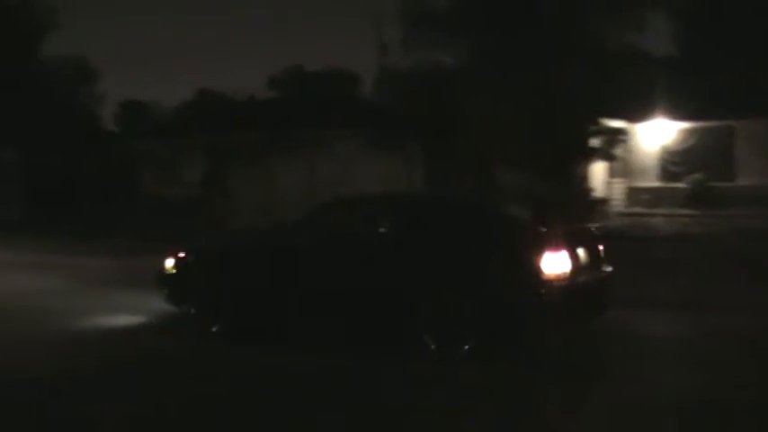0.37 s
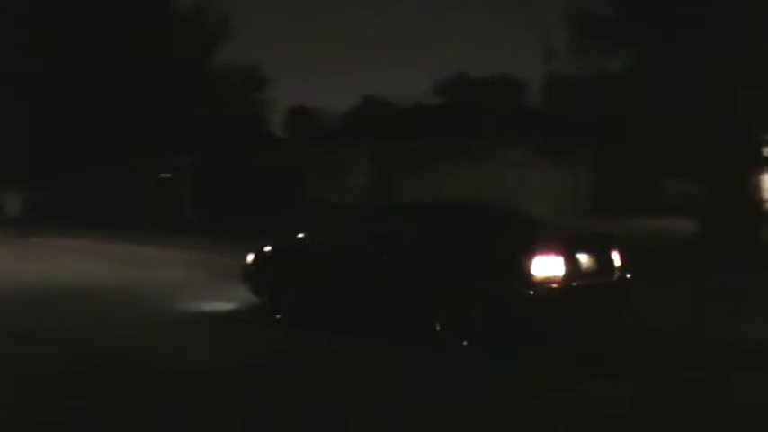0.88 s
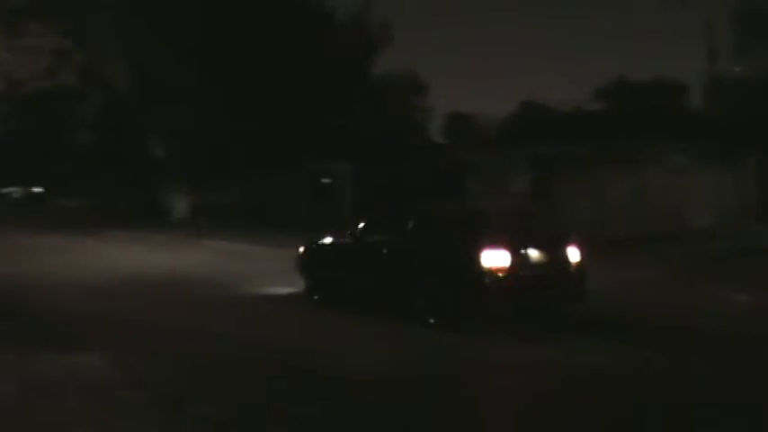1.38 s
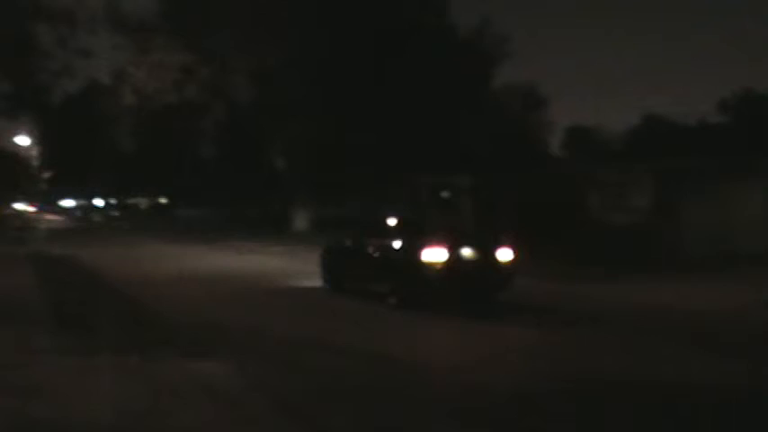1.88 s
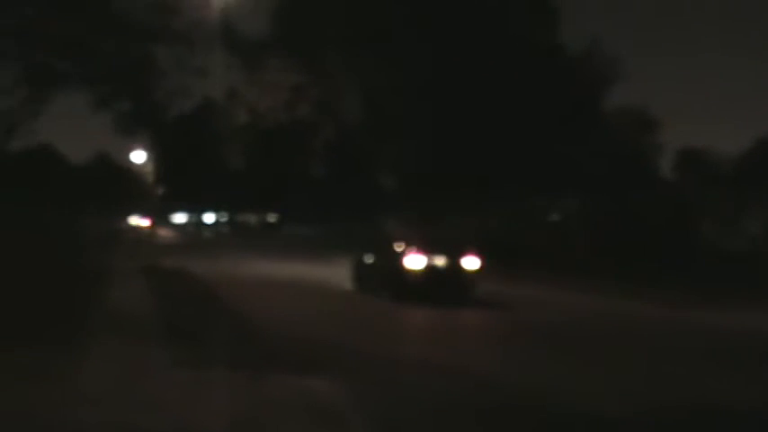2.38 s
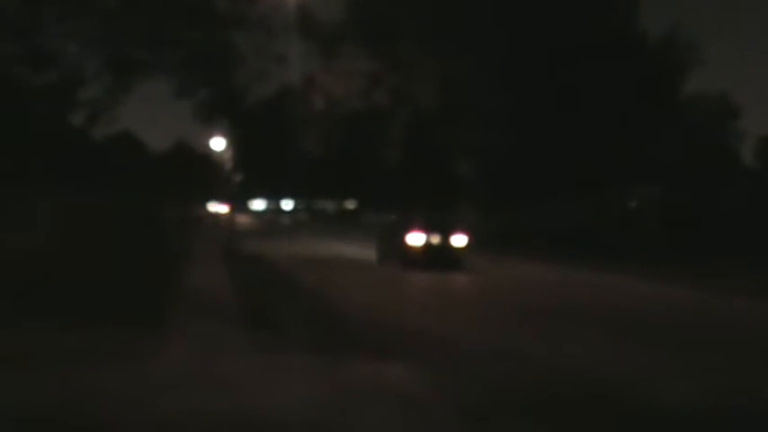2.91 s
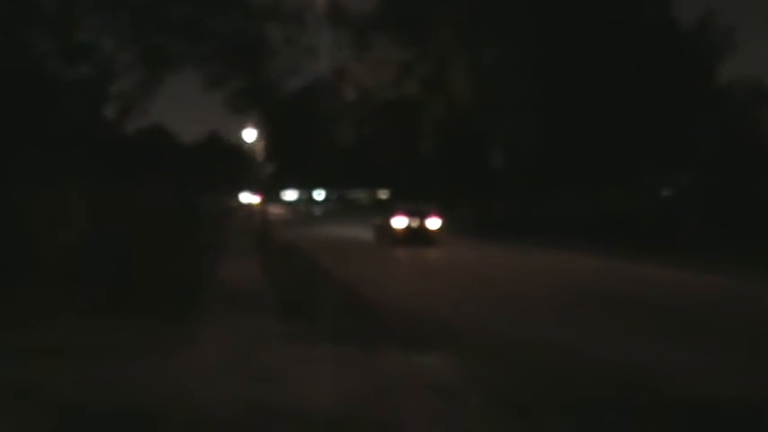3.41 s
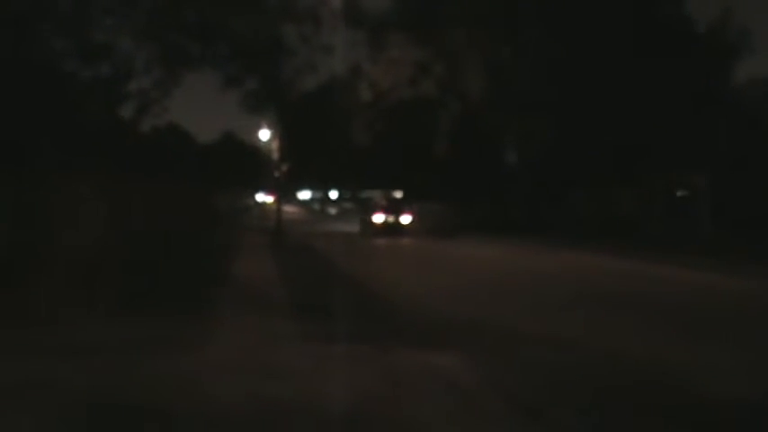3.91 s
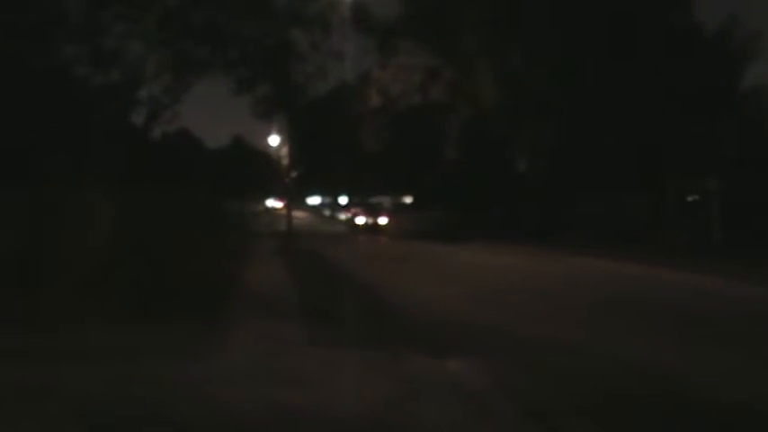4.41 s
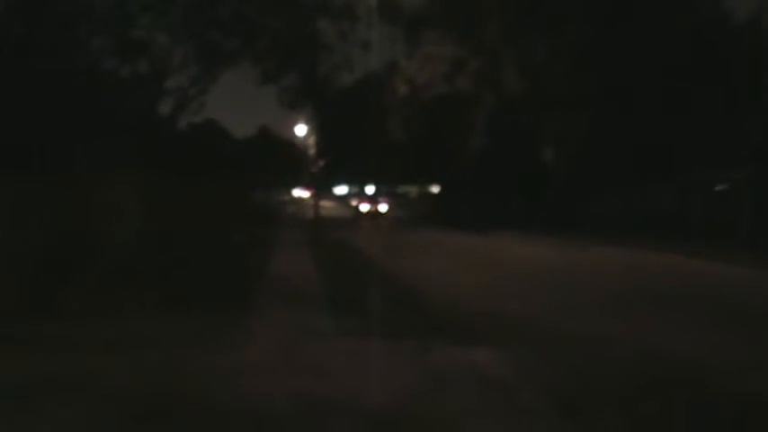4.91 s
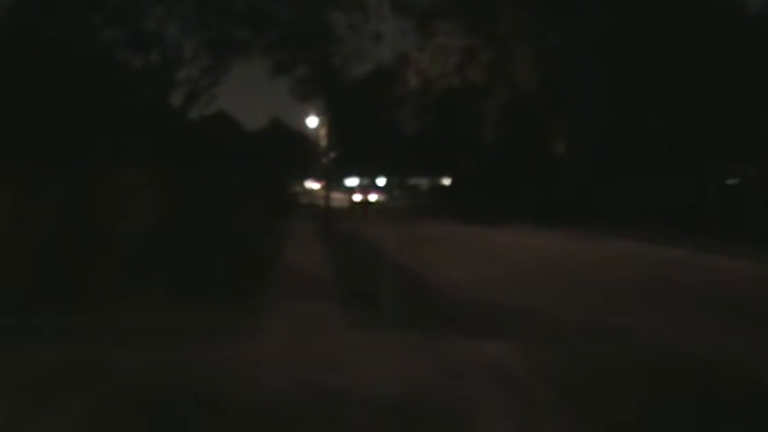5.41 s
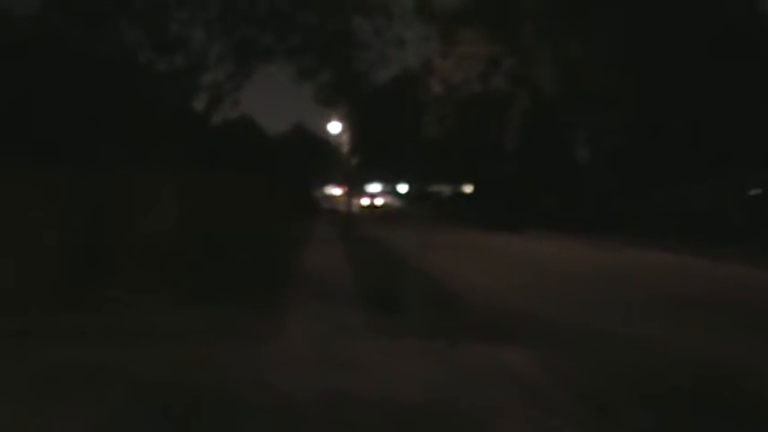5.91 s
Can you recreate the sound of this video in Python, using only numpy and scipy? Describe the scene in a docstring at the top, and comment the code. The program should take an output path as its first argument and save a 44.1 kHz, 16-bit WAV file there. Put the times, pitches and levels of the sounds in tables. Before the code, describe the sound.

Raw exhaust climbs fast over screeching wheelspin, drops briefly at a gearshift, barks and crackles, then pulls steadily into the distance.

```python
"""Car pulling away down a street

From the kerb: a car with a loud eight-cylinder exhaust starts off, spins its tyres, shifts up and roars away.
Uneven firing clicks and turbulent gas ring pipe resonators, under sharp cracks and steady engine orders.
Wavering stick-slip tones make the tyre squeals, shaped noise the hiss, rattle, rumble and drive-line thumps;
house fronts return dull echoes. A small two-port microphone hears the bass earlier on the left.
"""
import sys
import numpy as np
from scipy import signal
from scipy.fft import rfft, irfft, next_fast_len
from scipy.io import wavfile

SR = 44100
rng = np.random.default_rng(int(sys.argv[2]) if len(sys.argv) > 2 else 0)


def transcribe(signal):
    """Save signal, clipped to [-1, 1], as a 16-bit WAV file at the path in sys.argv[1]."""
    frames = np.atleast_2d(signal).T
    limited = np.clip(frames, -1, 1)
    pcm = np.round(limited * 32767).astype(np.int16)
    wavfile.write(sys.argv[1], SR, pcm)


def volts_from_db(level):
    """Convert decibel levels to linear amplitude ratios."""
    exponent = np.asarray(level, float) / 20
    return 10 ** exponent


N = 266364   # length [samples]

# Levels in these tables are relative, ahead of the trims in the functions.
# Crankshaft speed: (time [s], rate [four-stroke cycles per s])
CRANK_SPEED = [(0.0, 11.42), (0.2, 12.63), (0.7, 21.37), (1.3, 30.93), (2.0, 40.61), (2.22, 41.68),
               (2.28, 41.3), (2.36, 37.5), (2.45, 36.16), (2.62, 35.07), (3.0, 23.92), (3.17, 20.0),
               (3.28, 23.23), (3.45, 22.51), (3.6, 24.43), (3.72, 24.36), (3.9, 25.79), (4.2, 27.24),
               (4.7, 30.05), (5.1, 32.0), (5.35, 33.82), (5.7, 34.95), (6.04, 36.82)]
FIRST_FIRING_CYCLES = 0.085
# Cycle rates between which the firing pattern changes over: (low, high) [cycles per s]
CHANGEOVER_PER_S = (24, 30)
# Pulse strength in firing order: one row at low revs, one at high revs, (eight cylinders [dB])
CYLINDER_DB = ((-39, -12, -6, 4.5, -8, -13.5, 1, -8.5), (-1.5, 6.5, -16.5, -4.5, -0.5, 0, 1, -23))
# Delays of the unequal manifold runners: (eight cylinders [ms])
RUNNER_DELAY_MS = (0.85, 0.43, 1.1, 0.106, 0.7, 1.28, 0.066, 1.14)
PIPE_ECHO_MS, PIPE_ECHO_DB = 3.4, -40

# Exhaust, load and distance together: (time [s], boom [dB], bark [dB], orders [dB])
EXHAUST_LEVELS = [(0, -18, -32.5, -26.5), (.1, -22, -30, -25.5), (.3, -8, -27, -24.5),
                  (.55, -12.5, -20, -27.5), (1.0, -13.5, -20, -27.5), (1.6, -5.5, -20, -33),
                  (1.9, -13, -26, -29), (2.24, -30.5, -30.5, -32.5), (2.36, -36, -42, -31),
                  (2.62, -32, -39.5, -28), (2.75, -52, -41, -32.5), (2.79, -10.5, -24, -42),
                  (3.0, -13, -22.5, -33.5), (3.2, -16.5, -25, -36.5), (3.9, -9, -23, -34),
                  (4.5, -13.5, -30.5, -33.5), (4.9, -11.5, -28, -30), (5.4, -8, -26.5, -35.5),
                  (5.75, -11.5, -30, -31.5), (6.04, -16.5, -29, -34.5)]
# Combustion, roughest with the throttle shut: (time [s], turbulence against the pulses [dB])
TURBULENCE = [(0, 0), (.35, -3), (.9, -6), (2.27, -9), (2.32, 4), (2.74, 4), (2.78, -3), (3.0, -4),
              (3.3, -11), (6.04, -12)]
# Long pipe modes: (frequency [Hz], width [Hz], level [dB])
BOOM_MODES = [(141.7, 4.7, 2), (260.2, 20.3, -3), (345, 113, -1.5)]
# Short tailpipe modes: (frequency [Hz], width [Hz], level [dB])
BARK_MODES = [(587, 470, 33), (727, 106, 29.5), (833, 94, 8.5)]
# Sharp cracks on the firing pulses, brightest early and just after the shift:
# (start [s], end [s], dull crack [dB], bright crack [dB])
CRACKS = [(0.63, 0.82, -42, -36), (2.77, 2.795, -31, -50), (2.89, 3.0, -27, -50), (3.026, 3.294, -27, -42),
          (3.297, 3.497, -29, -45), (3.498, 3.896, -32, -49), (3.9, 4.3, -38, -56), (4.3, 6.04, -43, -62),
          (5.0, 5.3, -39, -60)]
# Dull and bright crack: (frequency [Hz], width [Hz], factor on the cylinders' dB contrast, top [Hz])
CRACK_MODES = [(900, 1400, 1.5, 1750), (2700, 700, 6, 3300)]
CRACK_RISE_DB_PER_S, CRACK_FALL_DB_PER_S = 600, 120
CRACK_UNDER_BARK_DB = (-24, -36)   # least level of the dull and the bright crack, against the bark

# Engine orders, strong and weak: (multiples of the cycle rate)
ORDER_NUMBERS = (3, 4, 5, 6, 7, 8, 9, 10, 11, 12, 13, 16, 17, 19, 22, 24, 14, 15, 18, 20, 21, 23, 26, 28)
# Strength of each order: rows beside the car, half behind, straight behind, far down the street, (orders [dB])
ORDER_DB = ((8, -7, 13, -27, -35, 10.5, -2, 5, 1.5, 8.2, -3.5, 9, -9, 0, 0.5, -6.5, -20, -4, 8, -25.5, -4, -24, -5, -0.5),
            (3, 3, 3.5, 6, 6.5, -18, 15, 5.5, 0.5, 8.5, -13, 3.5, 4.5, 7, 9.5, 5.5, -26, -3, -4, -12, -12, -5, -28, -7),
            (-6.5, -1.3, -2.5, 6.5, -28, 15, -2, -5, 11.5, 3, -21, 2.5, -6, 8, -1.5, -1, 2.5, -13, -7, 6, -4, -39, 1.5, -9),
            (-12.5, 3, -39, 11.5, 9, 13.5, 5, 4.5, 1, 1.3, -22, -4, -1, -21, -11, -6, 0.5, -2, 2.5, -14, 4.5, -1, -4, -9))
# Bearing: (tail starts to swing, is half turned, swings on, points at the microphone, recedes, is far) [s]
BEARING_S = (1.45, 1.8, 2.3, 2.9, 4.5, 5.4)
# How the pipe passes a steady order: (frequency [Hz], gain [dB])
PIPE_GAIN = [(35, -41), (60, -2.5), (90, -6.5), (120, -2), (150, 1), (180, -3.5), (210, -1), (240, 1.5),
             (270, 4), (300, -1), (340, 0.5), (380, -3), (430, -1), (520, -6), (700, 1), (1000, -11.5)]
SHUT_DB_PER_ORDER = -1.5   # with the throttle shut the higher orders fade
ORDER_FADE_DB = 2.0   # spread of the slow fading at order 16, in proportion at the others

# Air and road noise: (time [s], hiss [dB], tailpipe rattle [dB], rumble [dB])
NOISE_LEVELS = [(0, -35, -35.5, -15), (.2, -32.5, -53, -33), (.3, -35, -39.5, -40), (.9, -33.5, -47.5, -23),
                (1.6, -32, -44, -60), (2.25, -37, -45.5, -77), (2.42, -43, -96, -58), (2.72, -45, -81, -55),
                (2.82, -42, -41, -47), (3.1, -41.5, -55, -64), (3.45, -45, -51, -67),
                (3.75, -41.5, -45.5, -66), (4.3, -41.5, -47, -68), (5.0, -41, -48, -75),
                (6.04, -40, -49.5, -84)]
# Hiss colour: (frequency [Hz], density [dB per Hz])
HISS_COLOUR = [(880, 0), (1500, 6), (1820, -4), (2110, 0.5), (2860, -5.5), (3280, -7.5), (6690, -7.5),
               (12300, -15), (15500, -26)]
# Rattle modes: (frequency [Hz], width [Hz], level [dB])
RATTLE_MODES = [(2120, 100, -15), (3100, 160, 2), (4840, 590, 6), (5930, 560, -5), (11200, 890, -16)]
# Short puffs of hiss: (time [s], level above the steady noise [dB])
PUFFS = [(0.078, 9), (.12, 12), (0.163, 8), (.2, 8), (0.441, 6.5), (0.535, 9.5), (.59, 10), (1.68, 4),
         (2.491, 8)]
PUFF_S, PUFF_ABOVE_HZ = 0.014, 3700   # time from the peak to 1/e of the puff's dB; its lower edge

# Tyre squeal, bursts of wheelspin and chirps after the shift: (start [s], end [s], pitch [Hz], level [dB])
SQUEALS = [(0.544, 0.562, 1750, -33.5), (0.685, 0.703, 1870, -38), (0.797, 0.818, 1780, -30),
           (0.825, 0.85, 1840, -35), (1.094, 1.137, 1830, -24.5), (1.137, 1.17, 1585, -20),
           (1.187, 1.329, 1696, -23.5), (1.331, 1.543, 1645, -21), (1.551, 1.668, 1622, -20),
           (1.683, 1.732, 1700, -24.5), (1.736, 1.81, 1629, -15.5), (1.821, 1.855, 1688, -17.5),
           (1.88, 1.943, 1627, -15.5), (1.966, 2.005, 1667, -23.5), (2.01, 2.147, 1614, -16.5),
           (2.168, 2.192, 1631, -15), (2.213, 2.303, 1612, -13.5), (2.317, 2.366, 1602, -13),
           (2.38, 2.419, 1563, -23.5), (2.808, 2.897, 1559, -14), (2.9, 2.928, 1552, -23),
           (2.965, 2.993, 1617, -20.5), (2.987, 2.994, 1590, -14.5)]
# Flares of the upper tone: (start [s], end [s], level [dB])
FLARES = [(2.044, 2.089, -34), (2.845, 2.885, -21), (2.963, 2.99, -27)]
GRAB_DB_PER_S, LET_GO_DB_PER_S, SQUEAL_WANDER_HZ = 1200, 1200, 12
FLARE_HZ, RASP_HZ = 2067, 2118
OTHER_PATCHES_DB, LOWER_TONE_DB, RASP_DB = -8.5, -20, -23   # against the main squeal
OVERTONE_BLUR_RAD = 1.4

# Thumps as the drive line unloads and bites, and over bumps in the road: (time [s], peak level [dB])
THUMPS = [(2.32, -21), (2.785, -13.5), (3.511, -18), (4.793, -20)]
THUMP_T60_S, THUMP_BAND_HZ = 0.25, (70, 404)

STREET_T60_S, STREET_DB, WALL_CORNER_HZ = 1.05, -18, 6400
ENGINE_INTO_STREET_DB = -6
# Place of the direct sound: (time [s], engine left over right [dB], tyres left over right [dB])
PAN = [(0, -0.5, -2), (.6, -1, -2.5), (1.7, 0, -2), (3.0, -0.5, -2.5), (6.04, 0, -17)]
# Phase lead of the left port: (frequency [Hz], lead [radians])
LEFT_LEAD = [(20, 0.85), (260, 1.06), (600, 0.96), (1100, 0.52), (1900, 0.53), (4000, 0.14), (15000, .1)]
# Balance of the ports: (frequency [Hz], left over right [dB])
LEFT_LOUDER = [(60, 2.5), (180, 1.5), (550, 0.5), (1650, 0), (4970, 2), (15000, 0.5)]


def rms_one(x):
    """Scales to unit power."""
    return x / np.sqrt(np.mean(x ** 2) + 1e-20)


def in_time(rows):
    """One sample-rate curve per column after the time."""
    s, *columns = np.transpose(rows)
    return [np.interp(np.arange(N) / SR, s, column) for column in columns]


def at_hz(points, hz):
    """Reads a table on a log-frequency axis."""
    table_hz, values = np.transpose(points)
    return np.interp(np.log(hz + 1), np.log(table_hz), values)


def drift(rate_hz):
    """Slow chance with spread 1: white noise through two equal one-pole lowpasses."""
    r = np.exp(-2 * np.pi * rate_hz / SR)
    noise = rng.standard_normal(N + SR)
    return rms_one(signal.lfilter([1], [1, -2 * r, r * r], noise)[SR:])   # a second to settle


def cut(x, hz, kind, order=2):
    """Butterworth filter."""
    return signal.sosfilt(signal.butter(order, hz, kind, fs=SR, output="sos"), x)


def resonances(x, modes):
    """Parallel resonators; all start in step, so a click keeps its front."""
    out = 0
    for hz, width_hz, level_db in modes:
        r = np.exp(-np.pi * width_hz / SR)
        poles = [1, -2 * r * np.cos(2 * np.pi * hz / SR), r * r]
        zeros = [(1 - r * r) / 2, 0, (r * r - 1) / 2]
        out = out + volts_from_db(level_db) * signal.lfilter(zeros, poles, x + 1e-18)
    return out


def bursts(start, end, level_db, rise_db_per_s, fall_db_per_s):
    """Level in dB of the loudest burst: each rises, holds and falls on straight slopes."""
    t = np.arange(N)[:, None] / SR
    rise_db = rise_db_per_s * np.maximum(start - t, 0)
    fall_db = fall_db_per_s * np.maximum(t - end, 0)
    return np.max(level_db - rise_db - fall_db, axis=1)


def firings(cycles, high, steepness, spread_db, jitter_ms):
    """One click per firing; strong pulses shift to other cylinders and come earlier as revs rise."""
    firing = np.floor(8 * cycles + 0.3 * high).astype(int)
    at = np.flatnonzero(np.diff(firing, prepend=firing[0]))
    cylinder = firing[at] % 8
    low_db, high_db = np.array(CYLINDER_DB)[:, cylinder]
    level_db = steepness * ((1 - high[at]) * low_db + high[at] * high_db)
    top_db = np.interp(high[at], (0, 1), np.max(CYLINDER_DB, axis=1))
    level_db = level_db - (steepness - 1) * top_db   # steepening leaves the strongest pulse as it is
    late_ms = np.array(RUNNER_DELAY_MS)[cylinder] + jitter_ms * rng.random(N)[at]
    late = (late_ms * SR / 1000).astype(int)
    clicks = np.zeros(N)
    clicks[np.minimum(at + late, N - 1)] = volts_from_db(level_db + spread_db * rng.standard_normal(N)[at])
    return clicks


def exhaust(cycles, per_s):
    """Firing pulses and gas turbulence ring the pipe; sharper resonances on the pulses crack."""
    boom_db, bark_db, _ = in_time(EXHAUST_LEVELS)
    turbulence_db, = in_time(TURBULENCE)
    high = np.interp(per_s, CHANGEOVER_PER_S, (0, 1))
    even = 1 / np.sqrt(per_s)   # faster firing alone adds no power
    pulses = even * firings(cycles, high, 1, spread_db=1.2, jitter_ms=0.15)
    lag = int(PIPE_ECHO_MS * SR / 1000)
    pulses[lag:] += volts_from_db(PIPE_ECHO_DB) * pulses[:-lag]   # each pulse returns from the open end
    turbulence = volts_from_db(turbulence_db) * rng.standard_normal(N)
    gas = (rms_one(pulses) + turbulence) / np.sqrt(1 + volts_from_db(2 * turbulence_db))
    boom = rms_one(cut(resonances(gas, BOOM_MODES), 600, "low", order=5))
    bark = rms_one(cut(resonances(gas, BARK_MODES), 1050, "low", order=5))

    start, end, *rings_db = np.transpose(CRACKS)
    cracks = 0
    for mode, ring_db, under_db in zip(CRACK_MODES, rings_db, CRACK_UNDER_BARK_DB):
        hz, width_hz, steepness, top_hz = mode
        burst_db = bursts(start, end, ring_db, CRACK_RISE_DB_PER_S, CRACK_FALL_DB_PER_S)
        level_db = np.maximum(burst_db, bark_db + under_db)
        fronts = even * firings(cycles, high, steepness, spread_db=1.5, jitter_ms=0.4)
        ring = cut(resonances(fronts, [(hz, width_hz, 0)]), top_hz, "low", order=3)
        cracks = cracks + volts_from_db(level_db) * rms_one(ring)
    return volts_from_db(boom_db - 7.5) * boom + volts_from_db(bark_db + 3.5) * bark + cracks


def orders(cycles, per_s):
    """Engine orders from 3 to 28, in step with the firing pattern, coloured by the pipe, turned by a boom mode."""
    pattern = np.angle(np.fft.fft(volts_from_db(np.mean(CYLINDER_DB, axis=0))))
    orders_db = in_time(EXHAUST_LEVELS)[2]
    turbulence_db, = in_time(TURBULENCE)
    blur = 0.6 * volts_from_db(turbulence_db)
    shut = np.clip(turbulence_db / np.max(TURBULENCE, axis=0)[1], 0, 1)
    bearing = np.interp(np.arange(N) / SR, BEARING_S, (0, 1, 1, 2, 2, 3))   # row of ORDER_DB
    mode_hz, width_hz, _ = BOOM_MODES[1]   # the middle boom mode, near 260 Hz
    out = 0
    for k, strength_db in zip(ORDER_NUMBERS, np.transpose(ORDER_DB)):
        order_hz = k * per_s
        level_db = np.interp(bearing, np.arange(len(strength_db)), strength_db) + at_hz(PIPE_GAIN, order_hz)
        level_db = level_db + SHUT_DB_PER_ORDER * (k - ORDER_NUMBERS[0]) * shut
        level_db = level_db + ORDER_FADE_DB * k / 16 * drift(5.4)
        turn = np.arctan(2 * (mode_hz - order_hz) / width_hz)
        turn = turn + blur * np.sqrt(k / 8) * drift(66)
        out = out + volts_from_db(level_db) * np.cos(2 * np.pi * k * cycles + pattern[k % 8] + turn)
    return np.sqrt(2) * volts_from_db(orders_db) * out


def road_and_air(cycles):
    """Hiss and tailpipe rattle swell at points of the engine cycle; slow rumble lies below."""
    hiss_db, rattle_db, rumble_db = in_time(NOISE_LEVELS)
    white = rng.standard_normal((3, N))
    coloured = irfft(rfft(white) * volts_from_db(at_hz(HISS_COLOUR, np.fft.rfftfreq(N, 1 / SR))), N)
    near = np.interp(np.arange(N) / SR, (1.8, 3.0), (1, 0.3))   # distance takes the top off
    coloured = near * coloured + (1 - near) * cut(coloured, 9900, "low")
    hiss_swell = volts_from_db(1.7 * np.cos(2 * np.pi * 3 * cycles) + 1.8 * drift(140))
    hiss = rms_one(coloured[0] + 0.27 * coloured[1:]) * hiss_swell   # one shared noise, one for each side
    shake = volts_from_db(2.9 * np.cos(2 * np.pi * (cycles - 0.6)) + 5.4 * drift(180))
    rattle = rms_one(resonances(rng.standard_normal(N) * shake, RATTLE_MODES))
    rumble = rms_one(cut(rng.standard_normal(N), [18, 55], "band"))
    air = volts_from_db(hiss_db + 2.5) * hiss + volts_from_db(rattle_db + 4.0) * rattle

    at, puff_db = np.transpose(PUFFS)
    from_peak = (np.arange(N)[:, None] / SR - at) / PUFF_S
    puff = volts_from_db(np.sum(puff_db * np.exp(-from_peak ** 2), axis=1))
    return air + (puff - 1) * cut(air, PUFF_ABOVE_HZ, "high") + volts_from_db(rumble_db) * rumble


def stick_slip(hz, wander, second_db, third_db):
    """Tread blocks stick and slip: a wavering, grainy tone with overtones that sinks in gaps."""
    wavering_hz = hz * (1 + wander * (drift(40.35) + 0.705 * drift(250.4)))
    phase = 2 * np.pi * np.cumsum(wavering_hz) / SR
    grip = 0.13 + 1 / (1 + np.exp(-3.0 * (drift(28) + 1.4)))
    loose = OVERTONE_BLUR_RAD * drift(100)
    overtones = volts_from_db(second_db) * np.sin(2 * phase + loose) + volts_from_db(third_db) * np.sin(3 * phase + loose)
    grain = volts_from_db(2.0 * drift(79))
    return rms_one(grip * grain * (np.sin(phase) + overtones))


def tyres():
    """Tread patches squeal near one pitch, the main one new at each grab, with a weak lower tone and upper flares."""
    start, end, pitch_hz, burst_db = np.transpose(SQUEALS)
    # each pitch is set 5 ms before its burst
    burst = np.maximum(np.searchsorted(start - 0.005, np.arange(N) / SR) - 1, 0)
    hz = pitch_hz[burst] + SQUEAL_WANDER_HZ * drift(12.17)
    level_db = bursts(start, end, burst_db, GRAB_DB_PER_S, LET_GO_DB_PER_S)
    flare_db = bursts(*np.transpose(FLARES), GRAB_DB_PER_S, LET_GO_DB_PER_S)
    squeal = stick_slip(hz, 0.02, -24.5, -32.5)
    others = stick_slip(1560, 0.04, -10.5, -54) + stick_slip(1690, 0.04, -14, -51)
    lower = stick_slip(0.73 * FLARE_HZ, 0.0244, -26, -40)
    rasp = stick_slip(RASP_HZ, 0.045, -21, -40)
    squeal = squeal + volts_from_db(OTHER_PATCHES_DB) * others + volts_from_db(LOWER_TONE_DB) * lower + volts_from_db(RASP_DB) * rasp
    flare = stick_slip(FLARE_HZ, 0.016, -24, -27)
    flare = flare + volts_from_db(-4.0) * stick_slip(1.04 * FLARE_HZ, 0.033, -16, -26.0)
    return volts_from_db(level_db) * squeal + volts_from_db(flare_db) * flare


def thumps():
    """Each thump is low noise that dies away fast."""
    at, peak_db = np.transpose(THUMPS)
    level_db = bursts(at, at, peak_db, 3000, 60 / THUMP_T60_S)
    return volts_from_db(level_db) * rms_one(cut(rng.standard_normal(N), THUMP_BAND_HZ, "band", order=3))


def street(x):
    """Dull echoes from house fronts: six looping paths for each side, duller at every return."""
    size = next_fast_len(N + 2 * SR)
    hz = np.fft.rfftfreq(size, 1 / SR)
    lags_s = rng.uniform(0.027, 0.09, (2, 6, 1))
    wall = 1 / (1 + 1j * hz / WALL_CORNER_HZ)
    loop = volts_from_db(-60 * lags_s / STREET_T60_S) * np.exp(-2j * np.pi * hz * lags_s) * wall
    return irfft(rfft(x, size) * (loop / (1 - loop)).sum(axis=1), size)[:, :N]


def scene():
    """Engine, tyres and noise, panned, with the street around them."""
    per_s, = in_time(CRANK_SPEED)
    cycles = np.cumsum(per_s) / SR - FIRST_FIRING_CYCLES
    engine = exhaust(cycles, per_s) + orders(cycles, per_s) + thumps()
    air = road_and_air(cycles)
    squeal = tyres()
    engine_pan, tyre_pan = (volts_from_db(np.outer([0.5, -0.5], pan_db)) for pan_db in in_time(PAN))
    into_street = volts_from_db(ENGINE_INTO_STREET_DB) * cut(engine, 140, "high") + squeal
    echoes = volts_from_db(STREET_DB) * street(into_street)
    return engine * engine_pan + squeal * tyre_pan + air + echoes


def top_cut(x):
    """Nothing passes above the cut-off."""
    return signal.sosfilt(signal.butter(12, 15690, fs=SR, output="sos"), x)


def record(dry):
    """The two ports shift the bass in phase against each other; peaks are rounded."""
    hz = np.fft.rfftfreq(N, 1 / SR)
    lead = np.exp(0.5j * np.outer([1, -1], at_hz(LEFT_LEAD, hz)))
    louder = volts_from_db(np.outer([0.5, -0.5], at_hz(LEFT_LOUDER, hz)))
    ports = irfft(rfft(dry) * louder * lead, N) * volts_from_db(2.5)
    rounded = 0.76 * np.tanh(ports / 1.33)
    mix = cut(cut(rounded, 15500, "low", order=6), 49, "high")
    return top_cut(mix)


dry = scene()
out = record(dry)
transcribe(out)
```